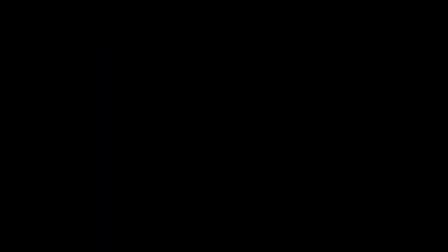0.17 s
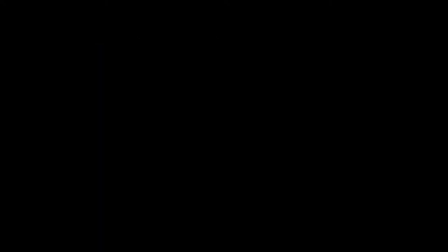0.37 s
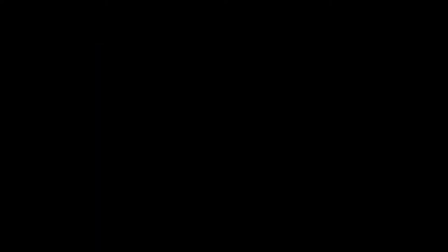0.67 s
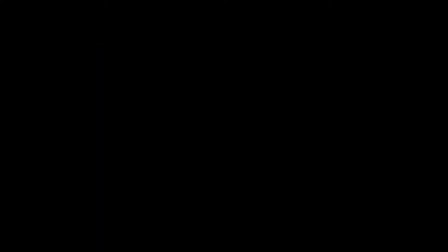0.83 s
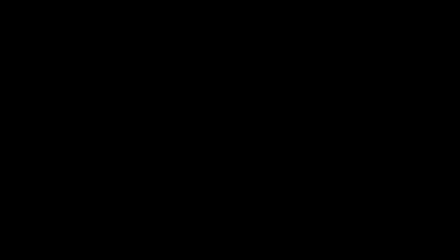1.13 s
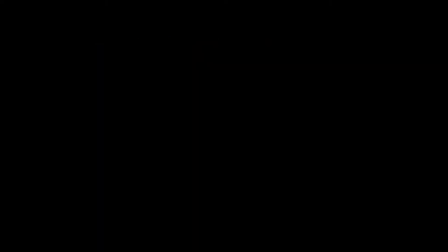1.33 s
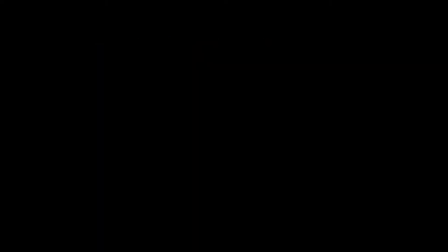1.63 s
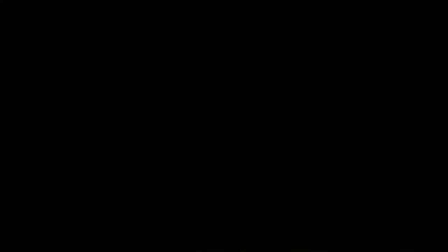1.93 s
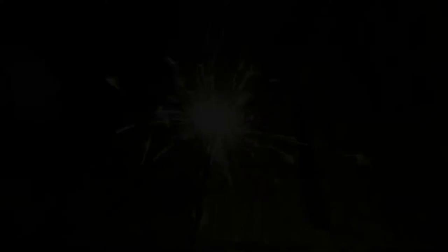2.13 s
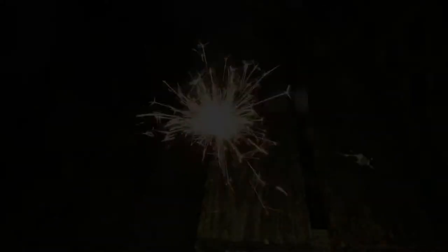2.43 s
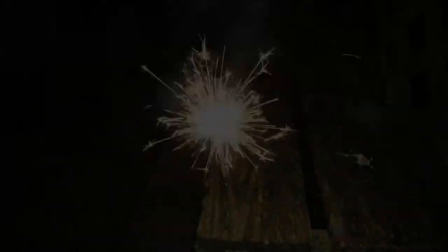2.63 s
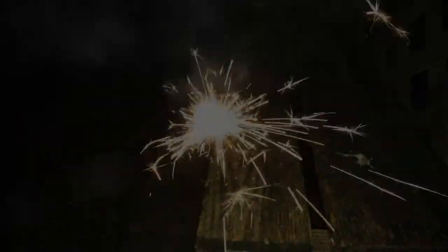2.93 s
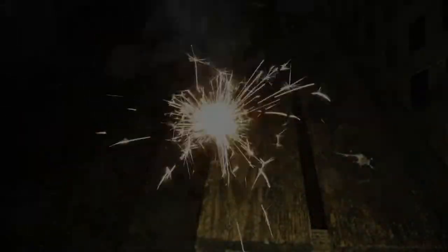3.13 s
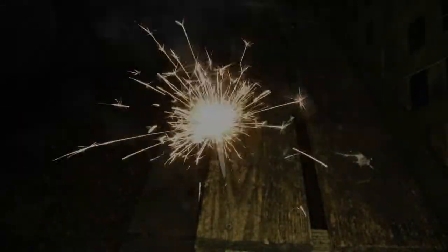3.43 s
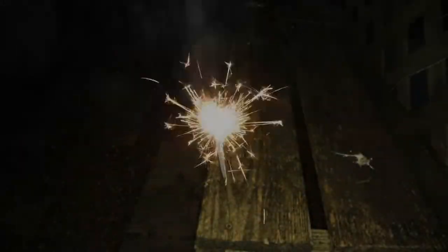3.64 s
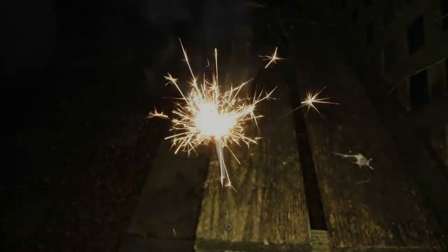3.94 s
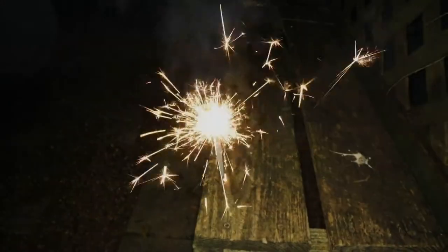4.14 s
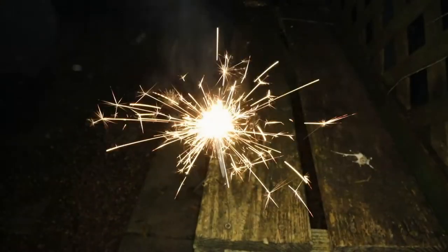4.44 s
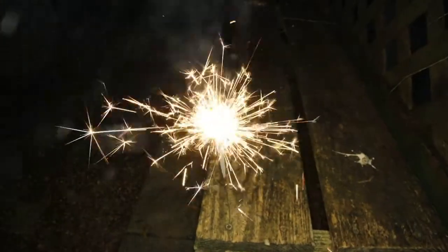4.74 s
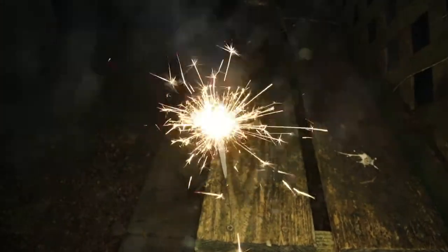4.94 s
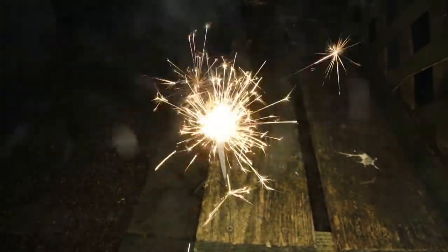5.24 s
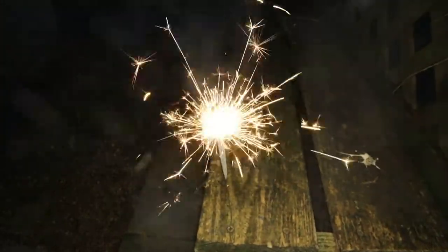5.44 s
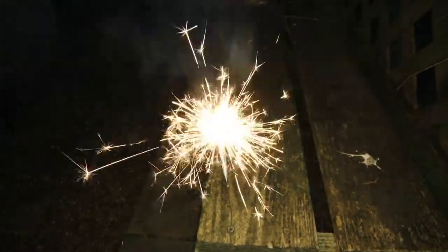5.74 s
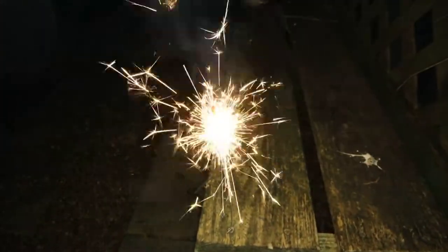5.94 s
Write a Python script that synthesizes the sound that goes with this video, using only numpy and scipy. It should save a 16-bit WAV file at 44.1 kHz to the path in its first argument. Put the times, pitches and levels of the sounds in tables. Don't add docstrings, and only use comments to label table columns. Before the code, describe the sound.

Steady crackling sparkler hiss with high insect chorus and cricket chirps, broken by a hard wooden clack, quick bounce and scattered grit.

```python
import sys
import numpy as np
from scipy import signal
from scipy.fft import rfft, irfft
from scipy.io import wavfile

SR = 44100
rng = np.random.default_rng(int(sys.argv[2]) if len(sys.argv) > 2 else 0)


def makeup_ratio(level_db):
    decades = np.asarray(level_db, float) / 20
    return 10 ** decades


def persist_wave(psi):
    counts = np.round(np.clip(psi, -1, 1) * 32767).astype(np.int16)
    wavfile.write(sys.argv[1], SR, np.atleast_2d(counts).T)


N = 268569

# f/Hz, density/dB per Hz
FIZZ_COLOUR = [(330, -9), (550, -1.5), (1100, -2), (1800, 0), (2700, -1), (4000, -6.5), (5500, -8.5),
               (8300, -2), (10500, 3.5), (13000, -1.5), (15500, -9)]
# t/s, rise/dB, length/s
FLARES = [(0.07, 2.5, 0.2), (0.287, 2.5, 0.084), (0.522, 5.5, 0.18), (0.804, 4.3, 0.08),
          (1.102, 4.5, 0.076), (1.275, 3.5, 0.16), (1.412, 3, 0.032), (1.536, 5.5, 0.05),
          (2.188, 3.1, 0.13), (2.353, 4, 0.037), (2.559, 2.5, 0.36), (2.983, -3, 0.057), (3.366, 4.5, 0.12),
          (3.56, 4.5, 0.12), (3.886, 1.5, 0.08), (4.107, 5.1, 0.091), (4.615, 2, 0.42), (4.944, 7.5, 0.05),
          (5.168, 5, 0.074), (5.288, 0, 0.04), (5.418, 4.5, 0.066), (5.6, 4.5, 0.16), (5.778, 7, 0.06),
          (6.086, 5.5, 0.058)]
# t/s, peak level/dB, body level/dB
NEAR_BURSTS = [(0.714, -36, -5), (1.045, -34, -3), (1.1071, -24, 0), (1.3028, -29, -13), (1.4108, -20, -14),
               (1.505, -32, 3), (1.5284, -26, 0), (2.1863, -24, -20), (2.347, -35, -13),
               (2.981, -23.5, -1.5), (3.5916, -26, -6), (4.4273, -20, -6), (4.5025, -23, -6),
               (4.8498, -21.5, -1), (5.4085, -32, -9), (5.4142, -17.5, -4), (5.434, -20, -9),
               (5.5016, -22, -7), (5.909, -21, -12), (5.9977, -22, -13)]
# t/s, peak level/dB, body level/dB
SCUFFS = [
    (1.7997, -19, -6),
    (1.8097, -17, -3),
]
# t/s, peak level/dB, f/Hz, ring/cycles, overtone level/dB
ASH_TICKS = [(0.067, -29, 1980, 8.9, -5), (0.252, -31, 1060, 11, -1), (0.6693, -24.5, 1400, 21, 0),
             (0.753, -24.5, 1860, 22, -2), (0.788, -27, 1330, 17, -6), (1.699, -36, 1020, 4.5, 14),
             (2.764, -29, 1570, 22, -2), (3.3707, -24, 2300, 12, -9), (3.393, -25, 1810, 8, -1),
             (4.0863, -26.5, 1000, 5.3, 4), (4.0864, -14.5, 2620, 24, -9), (4.1402, -18, 2500, 7.5, -12),
             (4.873, -30, 1580, 11, -7), (4.919, -20, 2570, 39, -8), (5.593, -24, 1870, 12, -3),
             (5.705, -27, 1550, 12, -5)]
# t/s, strength/dB, f of the dropped thing/Hz, boom level/dB, rattle level/dB
EDGE_BLOWS = [
    (1.8145, 0, 1700, 0, -14),
    (1.815, -11, 2810, -21, -22),
    (1.8263, -8, 500, -3, -36),
    (1.9556, -2.5, 1410, -7.5, -16.5),
    (1.967, -45, 714, -2, -19),
]
# t/s, strength/dB, f of the dropped thing/Hz, boom level/dB, rattle level/dB
FLAT_BLOWS = [
    (1.8159, -9, 560, 5, -19),
    (1.8547, -31, 2200, -20, 2),
    (1.887, -39, 1500, -20, 5.5),
    (1.941, -36, 1400, 5, 5.5),
    (2.0193, -17.5, 1360, -4, -8),
]
# t/s, strength/dB, f/Hz, boom level/dB, rattle level/dB
SOFT_BLOWS = [
    (2.074, -37, 500, 2, -4),
    (3.3693, -25.5, 580, 3.5, -17),
    (3.384, -29.5, 252, -12, -22),
    (3.428, -38, 300, -8, -22),
    (4.091, -38, 350, -1, -24),
    (4.522, -45, 300, -3, -28),
    (5.7403, -41, 330, 8, -27),
]
# f/Hz, level/dB, t60/s
BOARD_BOOM = [(96, 2.5, 0.044), (150.3, 1.5, 0.14), (242, -3.5, 0.13), (370, -29, 0.044)]
# f/Hz, level/dB, t60/s
BOARD_CLACK = [(500, -23, 0.074), (686, -0.5, 0.048), (1000, 4, 0.015), (1274, 2.5, 0.033),
               (2120, -2, 0.03), (2600, -21, 0.05), (2810, -20, 0.022), (5950, 7, 0.0019), (10100, 0, .003)]
# centre f/Hz, level/dB, t60/s
BOARD_RATTLE = [(134, 2, 0.43), (255, 7, 0.074), (494, 10, 0.088), (1100, 9.5, 0.14), (2200, 11.5, 0.056),
                (4440, 6, 0.066)]
# t/s, level/dB, t60/s
GRIT_SPRAYS = [
    (1.8143, -10.5, 0.04),
    (1.8255, -22, 0.11),
    (1.87, -37, 0.92),
    (1.956, -34, 0.57),
]
# t/s, rise/dB
THROBS = [(0.07, 3.5), (0.239, 4), (0.454, 4), (0.654, 3.5), (0.853, 3), (1.083, 3), (1.252, 4),
          (1.561, 3.5), (1.671, 3), (1.771, 2.5), (1.906, 2.7), (2.1, 3), (2.37, 3.5), (2.509, 4),
          (2.754, 3), (2.923, 2.5), (3.148, 4), (3.412, 4), (3.662, 3.5), (3.846, 5.1), (4.051, 5.5),
          (4.305, 4.9), (4.475, 3.5), (4.724, 3), (4.959, 3.5), (5.108, 3), (5.333, 4), (5.672, 3.5),
          (5.812, 3), (6.086, 5)]
# t/s, level/dB
TRILL_EFFORT = [(0.0, -45), (0.32, -42), (1.17, -41.5), (2.27, -40), (2.56, -41.5), (3.34, -41.5),
                (3.63, -43), (4.92, -40.5), (6.09, -42.5)]
# t/s, level/dB
CHIRPS = [(.032, -47), (.262, -49), (.455, -53), (.635, -50), (.88, -49), (1.09, -46), (1.265, -46),
          (1.5, -49), (1.7, -48), (2.089, -51), (2.27, -47), (2.51, -55), (2.69, -47), (2.935, -48),
          (3.17, -45), (3.385, -49), (3.6, -58), (3.825, -57), (4.059, -54), (4.265, -51), (4.47, -49),
          (4.78, -48), (5.01, -51), (5.238, -51), (5.475, -42), (5.722, -51), (5.95, -42)]
# f/Hz, density/dB per Hz
NIGHT_COLOUR = [(60, -30), (95, 0.5), (150, 0.5), (250, 3), (370, -5.5), (1000, -19), (3000, -18.5)]
# t/s, level/dB
TRAFFIC = [(0, -49.5), (1.2, -50), (1.7, -52), (2.3, -53.5), (3.1, -52), (3.6, -52.5), (4.2, -50),
           (4.7, -53.5), (5.3, -51.5), (6.09, -51.5)]
# t/s, peak level/dB, length/s
PUFFS = [(0.045, -69, 0.058), (0.309, -69.9, 0.2), (0.444, -75.3, 0.06), (0.703, -59, 0.18),
         (1.212, -70, 0.2), (1.312, -71.3, 0.05), (1.492, -68, 0.07), (1.821, -60, 0.16),
         (1.971, -55.9, 0.06), (2.488, -59, 0.12), (2.589, -68.6, 0.05), (2.863, -66, 0.09),
         (3.003, -74.7, 0.06), (3.367, -68.1, 0.09), (3.657, -70.7, 0.08), (3.931, -61, 0.2),
         (4.088, -58, 0.065), (4.435, -70.5, 0.11), (4.694, -88.4, 0.09), (4.959, -87.9, 0.06),
         (5.468, -70, 0.17), (5.822, -66.9, 0.14), (5.946, -71, 0.11)]


def rms_one(x):
    return x / np.sqrt(np.mean(x ** 2) + 1e-20)


def curve(rows):
    s, level_db = np.transpose(rows)
    return np.interp(np.arange(N) / SR, s, level_db)


def swells(rows):
    t = np.arange(0, N + 64, 64) / SR
    humps = [rise_db * np.exp(-(1.74 * (t - s) / length) ** 2) for s, rise_db, length in rows]
    return np.interp(np.arange(N) / SR, t, np.max(humps, axis=0))


def drift(rate_hz):
    r = np.exp(-2 * np.pi * rate_hz * 40 / SR)
    draws = rng.standard_normal(N // 40 + 2002)
    slow = signal.lfilter([1], [1, -2 * r, r * r], draws)[2000:]
    return np.interp(np.arange(N) / 40, np.arange(len(slow)), rms_one(slow))


def band(x, low_hz, high_hz):
    return signal.sosfilt(signal.butter(2, [low_hz, high_hz], "band", fs=SR, output="sos"), x)


def ring(clicks, hz, t60):
    r = makeup_ratio(-60 / (t60 * SR))
    w = 2 * np.pi * hz / SR
    return signal.lfilter([0, np.sin(w)], [1, -2 * r * np.cos(w), r * r], clicks + 1e-18)


def colour(x, spectrum):
    hz, level_db = np.transpose(spectrum)
    hz = np.r_[hz[0] / 2, hz]
    level_db = np.r_[level_db[0] - 20, level_db]
    bins = np.linspace(1, SR / 2, 4097)
    cepstrum = irfft(np.log(makeup_ratio(np.interp(np.log(bins), np.log(hz), level_db))))
    cepstrum[1:4096] *= 2
    cepstrum[4097:] = 0
    return signal.oaconvolve(x, irfft(np.exp(rfft(cepstrum))))[:N]


def grains(per_s, spread_db):
    sizes = makeup_ratio(spread_db * np.minimum(rng.exponential(1, N), 5)) * rng.choice([-1, 1], N)
    return sizes * (rng.random(N) < per_s / SR)


def place(out, s, sound):
    return out + np.pad(sound, (round(s * SR), N))[:N]


def sparkler():
    hiss_db, sputter_db = -43.5, -40.5
    flare_db = swells([(s, rise_db, 0.94 * length) for s, rise_db, length in FLARES])
    cracks_per_s = 2500 * makeup_ratio(2.2 * drift(7))
    cracks = rms_one(grains(cracks_per_s, spread_db=5.5))
    gas = rng.standard_normal(N) * makeup_ratio(0.9 * drift(10))
    fizz = colour(makeup_ratio(-6.5) * cracks + gas, FIZZ_COLOUR)
    sputter = signal.sosfilt(signal.butter(1, 5000, fs=SR, output="sos"), fizz)
    hiss = fizz - sputter
    return makeup_ratio(hiss_db + flare_db) * rms_one(hiss) + makeup_ratio(sputter_db + 0.16 * flare_db) * rms_one(sputter)


def bursts():
    edge, body = np.zeros((2, N))
    for s, peak_db, body_db in [*NEAR_BURSTS, *SCUFFS]:
        at = round((s + 0.0013) * SR)
        edge[at] = -makeup_ratio(peak_db + 4)
        body[at] = -makeup_ratio(peak_db + body_db)
    return ring(edge, 10500, 0.0009) + ring(body, 1500, 0.003)


def ticks():
    out = np.zeros(N)
    click = np.eye(1, 1500)[0]
    chatter = click + 0.08 * np.roll(click, round(0.00129 * SR))
    for s, peak_db, hz, cycles, overtone_db in ASH_TICKS:
        overtones = sum(ring(chatter, ratio * hz, 1.3 * cycles / hz) for ratio in (1.14, 1.45, 1.7))
        ringing = ring(chatter, hz, cycles / hz) + makeup_ratio(overtone_db) * overtones
        onset = np.minimum(np.arange(len(click)) * hz / SR / 0.75, 1)
        out = place(out, s, makeup_ratio(peak_db + 1) * band(ringing * onset, hz / 2, 1.54 * hz))
    return out


def deck():
    out = np.zeros(N)
    t = np.arange(16000) / SR
    click = np.eye(1, len(t))[0]
    contacts = [(11000, EDGE_BLOWS), (1740, FLAT_BLOWS), (640, SOFT_BLOWS)]
    blows = [(*row, contact_hz) for contact_hz, rows in contacts for row in rows]
    for s, blow_db, note_hz, boom_db, rattle_db, contact_hz in sorted(blows):
        thing = makeup_ratio(6) * ring(click, note_hz, 0.017)
        clack = sum(makeup_ratio(db - 8) * ring(click, hz, t60) for hz, db, t60 in BOARD_CLACK)
        boom = sum(makeup_ratio(db - 10) * ring(-click, hz, t60) for hz, db, t60 in BOARD_BOOM)
        rattle = []
        for hz, db, t60 in BOARD_RATTLE:
            noise = rms_one(band(rng.standard_normal(len(t)), hz / 2.07, hz * 1.37))
            decay = makeup_ratio(db + rattle_db - 9 - 60 * t / t60)
            rattle.append(noise * decay * np.minimum(t * hz / 2, 1))
        low = boom + rattle[0] + rattle[1]
        blow = thing + clack + sum(rattle[2:]) + makeup_ratio(boom_db) * low
        softening = signal.butter(1, contact_hz, fs=SR)
        out = place(out, s, makeup_ratio(blow_db) * signal.lfilter(*softening, blow))
    return out


def grit():
    out = np.zeros(N)
    t = np.arange(5000) / SR
    spray = rms_one(band(grains(9800, spread_db=0), 8200, 12500))
    for k, (s, level_db, t60) in enumerate(GRIT_SPRAYS):
        piece = spray[(k + 1) * len(t):][:len(t)]
        out = place(out, s, piece * makeup_ratio(level_db - 60 * t / t60))
    return out


def chorus(centre_hz, spread_hz, t60, strokes, count):
    dealt = rng.integers(0, count, N)
    total = np.zeros(N)
    for k, offset in enumerate(np.linspace(-2.2, 2.2, count)):
        hz = centre_hz + spread_hz * offset
        wing = ring(ring(strokes * (dealt == k), hz, t60), hz, t60)
        total = total + np.exp(-offset * offset / 4) * wing
    return rms_one(total)


def insects():
    throb_s = 0.15
    shrill_db = -36.5 + swells([(s, rise_db, throb_s) for s, rise_db in THROBS])
    shrill = chorus(7260, 161, 0.017, grains(2500, spread_db=-4), count=12)
    fringe = chorus(7075, 232, 0.0074, grains(2500, spread_db=-2), count=10)
    stroke_hz = 73.1 + 0.4 * drift(0.5)
    in_step = 1 + 0.24 * np.sin(2 * np.pi * np.cumsum(stroke_hz) / SR)
    trill = chorus(3325, 96.6, 0.039, grains(1500, spread_db=-1.5), count=10) * in_step
    return makeup_ratio(shrill_db) * (shrill + makeup_ratio(-5.5) * fringe) + makeup_ratio(curve(TRILL_EFFORT) + 0.5) * trill


def cricket():
    pulse_s, gap_s = 0.019, 0.022
    out = np.zeros(N)
    t = np.arange(round(pulse_s * SR)) / SR
    for s, level_db in CHIRPS:
        for k, (phase, luck) in enumerate(rng.normal(0, 1, (5, 2))):
            tone = np.sin(2 * np.pi * (7785 * t - 900 * t * t) + 0.85 * phase)
            pulse_db = level_db + 6.5 + 0.69 * k + 2.2 * luck
            out = place(out, s + gap_s * k, makeup_ratio(pulse_db) * np.sin(np.pi * t / t[-1]) * tone)
    return out


def night():
    level_db = curve(TRAFFIC) + 0.94 * drift(0.42)
    return makeup_ratio(level_db) * rms_one(colour(rng.standard_normal(N), NIGHT_COLOUR))


def breeze():
    calm_db = -93
    puff_db = calm_db + swells([(s, peak_db - calm_db, 1.1 * length) for s, peak_db, length in PUFFS])
    return makeup_ratio(puff_db) * rms_one(band(rng.standard_normal(N), 25, 60))


def scene():
    air = sparkler() + bursts() + ticks() + deck() + grit() + insects() + cricket() + night()
    port = signal.butter(4, 62, "high", fs=SR, output="sos")
    return (signal.sosfilt(port, air) + breeze())[None]


def roll_off(x):
    return signal.sosfilt(signal.butter(12, 15710, fs=SR, output="sos"), x)


def record(dry):
    t = np.arange(N) / SR
    over_db = np.maximum(20 * np.log10(np.abs(dry[0]) + 1e-9) + 6, 0)
    fast, slow = 450 * t, 25 * t
    held_db = np.maximum.accumulate(over_db + fast) - fast
    duck_db = signal.lfilter([0.01], [1, -0.99], held_db)
    long_held_db = np.maximum.accumulate(over_db + slow) - slow
    sag_db = signal.lfilter([0.002], [1, -0.998], long_held_db)
    limited = dry * makeup_ratio(-0.6 * duck_db - 0.067 * sag_db)
    rounded = 0.77 * np.tanh(limited / 0.77)
    mix = signal.sosfilt(signal.cheby2(12, 60, 16400, fs=SR, output="sos"), rounded)
    return roll_off(mix)


dry = scene()
out = record(dry)
persist_wave(out)
```